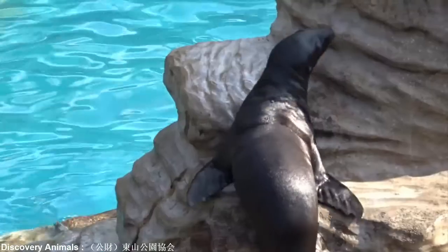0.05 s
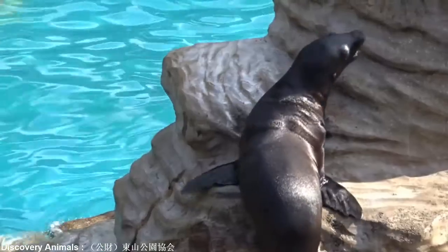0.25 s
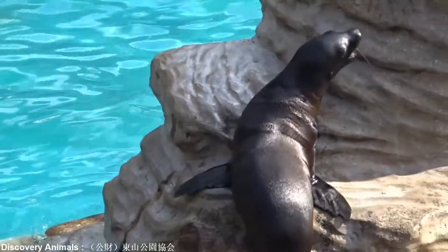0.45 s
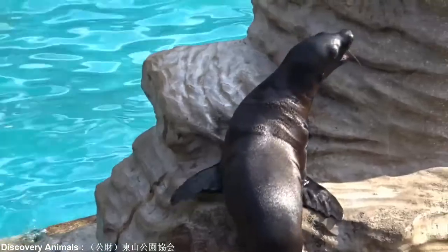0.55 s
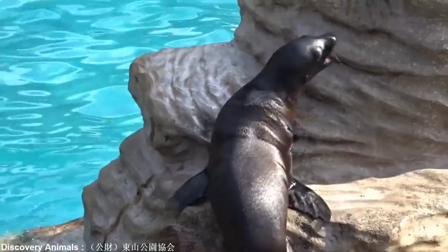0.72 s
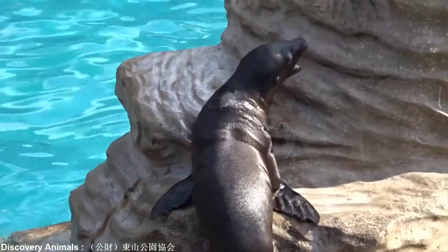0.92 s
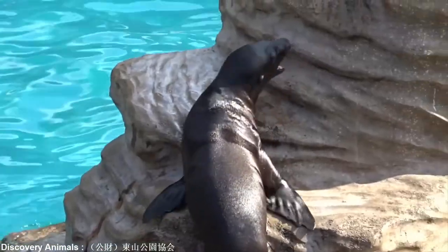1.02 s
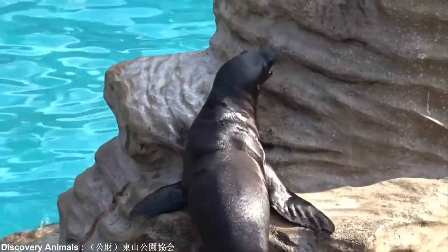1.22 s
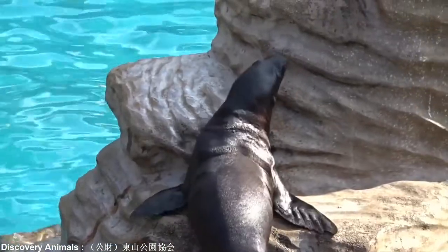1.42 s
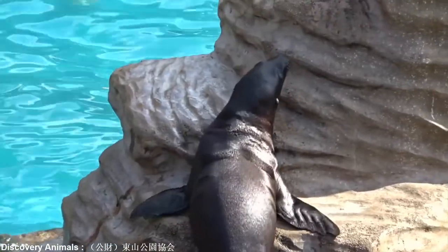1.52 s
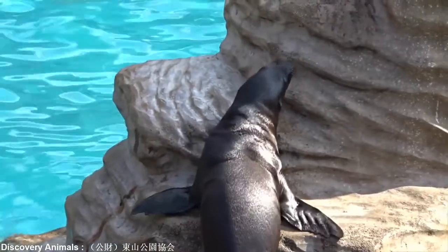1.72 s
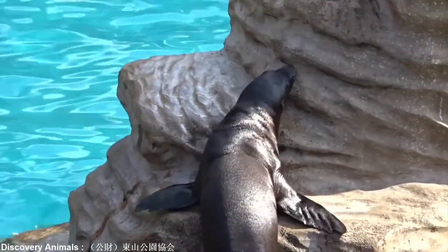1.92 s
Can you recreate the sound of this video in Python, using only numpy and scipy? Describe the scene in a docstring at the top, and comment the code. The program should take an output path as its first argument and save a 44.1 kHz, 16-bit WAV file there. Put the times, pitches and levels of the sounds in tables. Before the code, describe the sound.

A young sea lion gives one loud, rough, bleating cry close by, ending in a throaty rattle that echoes off rock walls. Fainter cries come before and after, while pool water laps softly with a few drips.

```python
"""A pool among rocks: a young sea lion gives one loud, rough cry, with a harsh attack, a bleating
middle and a rattle as the mouth closes. Its vocal folds send pulses and puffs of air through a mouth
that glides from shape to shape, and the rock walls answer. Fainter cries sit before and after it.
Underneath, the water laps throughout as a bed of wavering noise, with a few drips and a slap on top."""
import sys
import numpy as np
from scipy import signal
from scipy.fft import rfft, irfft, next_fast_len
from scipy.io import wavfile
from scipy.ndimage import uniform_filter1d, minimum_filter1d, map_coordinates

SR = 44100
rng = np.random.default_rng(int(sys.argv[2]) if len(sys.argv) > 2 else 0)


def transcribe(u):
    """Save the signal u as a 16-bit wav file named by the first command-line argument.

    u: samples, shape (n,) or (channels, n), limited to [-1, 1]; the rate is SR.
    q: integer samples, one column per channel.
    """
    v = np.clip(np.atleast_2d(u).T, -1, 1)
    q = np.round(v * 32767).astype(np.int16)
    wavfile.write(sys.argv[1], SR, q)


N = 85995

# tone of the water bed (frequency [Hz], level [dB])
WATER_EQ = [(25, -16), (60, -31), (150, -24.5), (300, -16.5), (500, -11), (950, -3), (1400, -4),
            (2500, -6.5), (4000, -8.5), (5500, -17.5), (7500, -21.5), (9500, -20), (11000, -27.5),
            (12000, -35), (15500, -34)]
# fader ride on the water (time [s], level [dB])
WATER_LEVEL = [(0, -47), (.1, -41), (.17, -42.5), (.24, -35), (1.3, -38), (1.55, -40.5), (1.75, -39.5),
               (1.83, -38.5), (1.95, -39.5)]
# stereo image of water and air rush (frequency [Hz], left-right correlation [0-1])
CORRELATION = [(100, 0.64), (600, 0.95), (1500, 0.72), (4000, 0.2), (12000, 0.23)]
# drips and slaps (time [s], level [dB], band centre [Hz], width [octaves], t60 [s])
SPLASHES = [(0.041, -35.5, 4200, 0.68, 0.022), (0.089, -44.5, 8660, 0.35, 0.082),
            (.1, -45, 6960, 0.74, 0.061), (.122, -43.5, 5950, .9, 0.062), (1.8493, -27, 1570, 0.73, 0.029)]
# reverb tail of the far walls (frequency [Hz], t60 [s])
WALL_DECAY = [(200, 0.77), (900, 0.31), (1230, 1.52), (1600, 0.47), (3000, 0.88), (6000, 1.085),
              (12000, 0.17)]
# width of the earliest reflections (frequency [Hz], side against mid [dB])
SIDE_EQ = [(300, -18), (1000, -34), (2000, -15), (4500, -11), (8000, -18), (14000, -35)]
# the background cries (time [s], pitch [Hz], level [dB])
FAR_CRIES = [(0, 302.6, -53), (.08, 315.7, -43), (.15, 322.4, -38), (.24, 316, -50), (.3, 298, -75),
             (1.22, 303, -72), (1.3, 310, -35), (1.4, 307.7, -46), (1.48, 308.2, -50.5), (1.56, 303, -75)]
# their duller throat (frequency [Hz], level [dB])
FAR_THROAT = [(300, -29), (700, -25), (960, -11), (1250, -5), (1420, -4), (1600, -10), (1850, -15),
              (2200, -13.5), (3000, -36), (6000, -30), (15000, -38)]
# tone of the breath at the folds (frequency [Hz], level [dB])
BREATH_EQ = [(300, 5), (1200, -3), (3000, -2), (5000, 1), (7000, 7), (12000, 11)]
# low rush of air under the cry (frequency [Hz], level [dB])
RUSH_EQ = [(25, -4), (90, -0.5), (200, 3), (400, 3.5), (900, -8), (2500, -80)]
# reach of the close reflections' colouring (frequency [Hz], share of full depth [0-1])
COMB_DEPTH = [(1500, .2), (3000, .5), (4500, 1)]
# pitch line of the main cry, diving into the rattle (time [s], pitch [Hz])
PITCH = [(.24, 300), (.262, 333.7), (.285, 264.9), (.305, 320.8), (.335, 310.8), (0.355, 272.8),
         (0.377, 286.3), (0.389, 288.9), (0.519, 302.6), (0.537, 304.3), (0.549, 330.3), (0.563, 324.7),
         (0.605, 318.6), (0.629, 331.4), (0.655, 311.7), (0.697, 318.2), (0.725, 309.6), (0.759, 308.3),
         (0.789, 298.5), (0.817, 305.7), (0.865, 304.2), (0.881, 312.8), (0.923, 309.8), (0.943, 316.4),
         (0.955, 329.2), (1.029, 322.3), (1.041, 318.5), (1.093, 324.1), (1.123, 301.1), (1.151, 306.5),
         (1.16, 298.5), (1.18, 271.1), (1.215, 95.1), (1.28, 60.12)]
# push behind the cry (time [s], relative level [dB])
EFFORT = [(.2375, -42), (.241, -24), (.249, -16.5), (.262, -18.5), (.28, -16.2), (.3, -17.2), (.35, -15.2),
          (.42, -16), (.51, -15.7), (.533, -18), (.555, -15.5), (.7, -15.2), (.79, -16.5), (.83, -15.2),
          (.95, -15.7), (1.09, -14.2), (1.17, -15.5), (1.21, -19.5), (1.245, -21.5), (1.27, -27),
          (1.3, -35), (1.34, -48)]
# rasp of the folds (time [s], roughness [0-1])
ROUGHNESS = [(.24, .6), (.32, .52), (.37, .38), (.42, .28), (.5, .17), (.54, .42), (.59, .28), (.66, .36),
             (.74, .32), (.8, .22), (.86, .3), (.92, .32), (.99, .25), (1.08, .21), (1.16, .32),
             (1.185, .94), (1.28, .98)]
# formants of six throat and mouth shapes, each (frequency [Hz], level [dB])
ONSET = [(300, -45), (1100, -17), (1700, 7), (2250, -18), (2850, 6.5), (3300, -2), (3800, 5.5), (4600, -16),
         (7000, -27), (15500, -37)]
OPENING = [(300, -34), (1020, -29.5), (1260, 4.5), (1500, -13), (1700, 0), (1950, -14), (2280, 6.5),
           (2550, -9), (2930, 4.5), (3700, 0), (4400, -10.5), (6500, -17.5), (9000, -32), (15500, -36.5)]
WIDE = [(300, -37), (750, -33), (960, -17.5), (1200, 0), (1450, -11.5), (1680, -1.5), (2000, -23.5),
        (2300, -11.5), (2620, -22), (2950, -1), (3250, -18), (3550, -13.5), (3850, -18), (4300, -8.5),
        (4850, -15.5), (5250, -14.5), (6100, -30), (9000, -35.5), (15500, -43)]
STRAINED = [(300, -26.5), (700, -27.5), (920, -9), (1230, 5), (1560, 2.5), (1850, -1), (2150, -8.5),
            (2750, -9.5), (3060, 2), (3380, -4), (3800, -17), (4500, -13), (6000, -17), (7900, -17.5),
            (8400, -19.5), (9200, -24), (15500, -38)]
NARROWING = [(300, -36.5), (740, -33.5), (950, -11.5), (1280, -6.5), (1600, 2), (1920, -3), (2260, -2.5),
             (2560, -27), (2920, -3.5), (3230, -20), (3560, -9), (4100, -20.5), (4880, -8), (5600, -14.5),
             (7200, -20.5), (8500, -28), (15500, -39)]
CLOSING = [(380, -23), (520, 0), (780, -7), (1230, 11), (1700, 15.5), (2300, 13), (3000, 2), (4200, -4),
           (6500, -10.5), (9000, -23), (15500, -37)]
# the mouth's path through them (time [s], shape [name])
MOUTH_PATH = [(.253, "onset"), (.268, "opening"), (.335, "opening"), (.385, "wide"), (.7, "wide"),
              (.8, "strained"), (.915, "strained"), (.975, "narrowing"), (1.085, "narrowing"),
              (1.125, "strained"), (1.16, "strained"), (1.185, "closing")]

TIME = np.arange(N) / SR


def amp(db):
    """Decibels to gain."""
    return 10 ** (np.asarray(db) / 20)


def unit(x):
    """Scale to rms 1."""
    return x / np.sqrt(np.mean(x ** 2) + 1e-20)


def along(points, hz):
    """Read a breakpoint curve on a log frequency axis."""
    freqs, values = np.transpose(points)
    return np.interp(np.log(hz + 1), np.log(freqs + 1), values)


def curves(rows):
    """One automation lane for each column after the time."""
    times, *columns = np.transpose(rows)
    return [np.interp(TIME, times, column) for column in columns]


def wobble(rate_hz):
    """Smooth random modulation through rate_hz knots a second."""
    return map_coordinates(rng.standard_normal(4096), [TIME * rate_hz], mode="wrap")


def filtered(x, response):
    """Filter x by a gain given as a function of frequency."""
    size = next_fast_len(N + SR // 2)
    return irfft(rfft(x, size) * response(np.fft.rfftfreq(size, 1 / SR)), size)[..., :N]


def ring(x, eq):
    """Minimum-phase EQ: resonances ring on after each pulse."""
    size = 2 * next_fast_len(N)
    cepstrum = irfft(np.log(amp(along(eq, np.fft.rfftfreq(size, 1 / SR)))))
    cepstrum[1:size // 2] *= 2
    cepstrum[size // 2 + 1:] = 0
    return irfft(rfft(x, size) * np.exp(rfft(cepstrum)))[..., :N]


def wash(eq):
    """Stereo noise of rms 1, narrow in the mids and wide in the treble."""
    def mid_side(hz):
        angle = np.arccos(along(CORRELATION, hz)) / 2
        return amp(along(eq, hz)) * [np.cos(angle), np.sin(angle)]
    mid, side = filtered(rng.standard_normal((2, N)), mid_side)
    return unit(np.array([mid + side, mid - side]))


def pool(lap_db=1):
    """The bed: water washing against the rocks."""
    db, = curves(WATER_LEVEL)
    return amp(db + lap_db * wobble(rate_hz=24.794)) * wash(WATER_EQ)


def splashes(snap_gain=1.4):
    """Each drip or slap is a snap of first contact and a short spray in its own band."""
    out = np.zeros(N)
    for start, db, centre, width, t60 in SPLASHES:
        age = TIME - start
        band = lambda hz: np.exp(-.5 * (np.log2((hz + 1) / centre) / width) ** 2)
        snap = filtered(np.sinc(age * SR), band)
        spray = unit(filtered(rng.standard_normal(N), band)) * (age > 0) * amp(-60 * abs(age) / t60)
        out += amp(db) * (snap_gain * snap / abs(snap).max() + spray)
    return out


def reflections(x, t60s, predelay_s):
    """Diffuse returns off rock, different in each ear, dying away by a (frequency [Hz], t60 [s]) curve."""
    hz, t, noise = signal.stft(rng.standard_normal((2, SR)), SR, nperseg=256)
    tail = signal.istft(noise * amp(-60 * t / along(t60s, hz)[:, None]), SR, nperseg=256)[1]
    tail = np.pad(tail / np.linalg.norm(tail[0]), ((0, 0), (int(predelay_s * SR), 0)))
    return signal.fftconvolve(x[None], tail, axes=1)[:, :N]


def smeared(x, depth_rad=.75, grain_hz=260):
    """Paths of unequal length round the head and rock spread each pulse without colouring it."""
    knots = rng.standard_normal(256)
    phase = lambda hz: depth_rad * map_coordinates(knots, [hz / grain_hz], mode="wrap")
    return filtered(x, lambda hz: np.exp(1j * phase(hz)))


def combed(x, depth_db=3.2, grain_hz=240, rate_hz=9):
    """As the head turns, close reflections lift some overtones and sink others, mostly up top."""
    hz, t, spectrum = signal.stft(x, SR, nperseg=1024)
    grid = np.meshgrid(hz / grain_hz, t * rate_hz, indexing="ij")
    ripple = map_coordinates(rng.standard_normal((128, 64)), grid, mode="wrap")
    gain = amp(depth_db * along(COMB_DEPTH, hz)[:, None] * ripple)
    return signal.istft(spectrum * gain, SR, nperseg=1024)[1][:N]


def folds(pitch, rough, waver=.018, jitter_cycles=.08, shimmer_db=4, breath_gain=.8):
    """Vocal folds: one sharp pulse and one puff of air per cycle, less even and breathier when rough."""
    cycles = np.cumsum(pitch * (1 + waver * rough * wobble(rate_hz=60))) / SR
    slip, strength = rng.standard_normal((2, 1024))[:, :int(cycles[-1])]
    count = np.arange(len(slip))
    pulse_rough = np.interp(count, cycles, rough)
    pulse_at = np.sort(np.interp(count + jitter_cycles * pulse_rough ** 2 * slip, cycles, np.arange(N)))
    # windowed sincs place the pulses between samples
    taps = pulse_at.astype(int)[:, None] + np.arange(-7, 9)
    offset = taps - pulse_at[:, None]
    clicks = np.sinc(offset) * np.cos(np.pi * offset / 16) ** 2
    clicks *= amp(shimmer_db * pulse_rough * strength)[:, None]
    pulses = np.bincount(np.clip(taps, 0, N - 1).ravel(), clicks.ravel(), N) * np.sqrt(SR / pitch)
    cycle_phase = np.interp(np.arange(N), pulse_at, count) % 1
    puffs = unit(np.exp(-1.8 * cycle_phase))
    breath = ring(puffs * rng.standard_normal(N), BREATH_EQ)
    return np.sqrt(1 - rough ** 2) * pulses + breath_gain * rough ** 1.5 * breath


def far_cries():
    """Fainter, duller cries from farther off: folds through one held throat shape."""
    pitch, db = curves(FAR_CRIES)
    buzz = smeared(folds(pitch, rough=np.full(N, .2)))
    return amp(db) * (TIME < FAR_CRIES[-1][0]) * unit(ring(buzz, FAR_THROAT))


def mouth(buzz, levelling_s=.022):
    """Throat and mouth resonances crossfade from shape to shape at an even loudness."""
    shapes = dict(onset=ONSET, opening=OPENING, wide=WIDE,
                  strained=STRAINED, narrowing=NARROWING, closing=CLOSING)
    voice = np.zeros(N)
    for name, formants in shapes.items():
        fade, = curves([(time, shape == name) for time, shape in MOUTH_PATH])
        voice += fade * unit(ring(buzz, formants))
    span = int(levelling_s * SR)
    power = abs(uniform_filter1d(uniform_filter1d(voice ** 2, span), span))
    return voice / np.sqrt(power + 1e-12)


def cry(trim_db=-.5, swell_db=.9, rush_db=-26, rush_fade_db_per_s=11.5):
    """The lead voice and its fading rush of air, both riding the sea lion's uneven push."""
    (pitch,), (effort_db,), (rough,) = curves(PITCH), curves(EFFORT), curves(ROUGHNESS)
    start, end = EFFORT[0][0], EFFORT[-1][0]
    push = amp(trim_db + effort_db + swell_db * wobble(rate_hz=45)) * (TIME > start) * (TIME < end)
    voice = mouth(combed(smeared(folds(pitch, rough))))
    rush = amp(rush_db - rush_fade_db_per_s * (TIME - start)) * wash(RUSH_EQ)
    return push * voice, push * rush


def scene(rock_db=-16, walls_db=-16):
    """The mix: animals and water between a near rock face and farther walls."""
    voice, rush = cry()
    direct = voice + far_cries() + splashes()
    early = reflections(direct, [(1000, .028)], predelay_s=.001)[0]
    side = filtered(early, lambda hz: amp(along(SIDE_EQ, hz)))
    rock = amp(rock_db) * reflections(direct, [(1000, .089)], predelay_s=.004)[0]
    walls = amp(walls_db) * reflections(direct, WALL_DECAY, predelay_s=.025)
    return direct + rock + np.array([side, -side]) + walls + rush + pool()


def record(dry, ceiling=.68, hold_s=.008, high_cut_hz=15950):
    """Master chain: a limiter holds the peaks down, then a steep high cut."""
    safe_gain = np.minimum(1, ceiling / (abs(dry).max(axis=0) + 1e-9))
    hold = int(hold_s * SR)
    gain = uniform_filter1d(minimum_filter1d(safe_gain, hold), hold)
    return filtered(dry * gain, lambda hz: hz < high_cut_hz)


dry = scene()
out = record(dry)
transcribe(out)
```